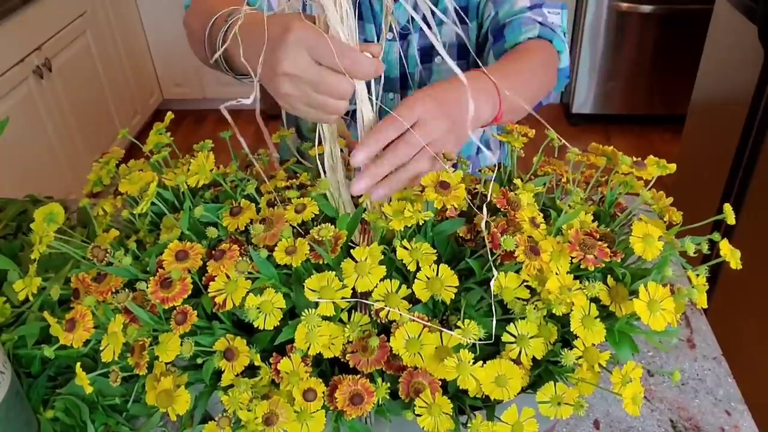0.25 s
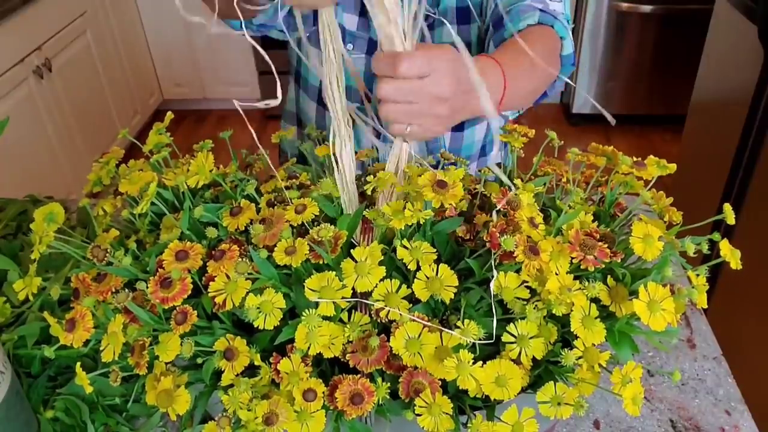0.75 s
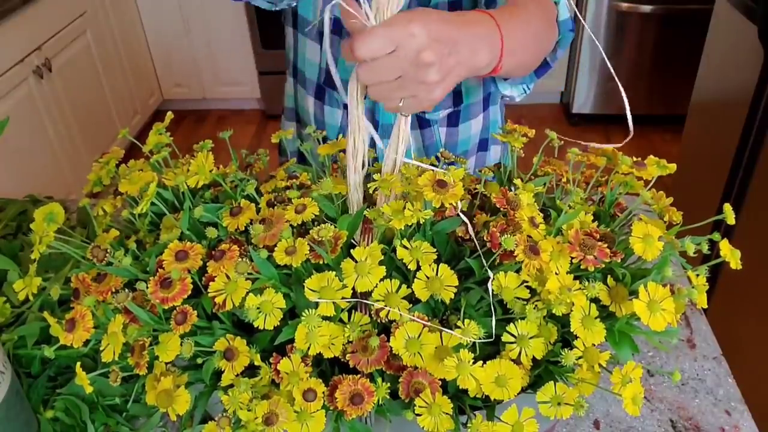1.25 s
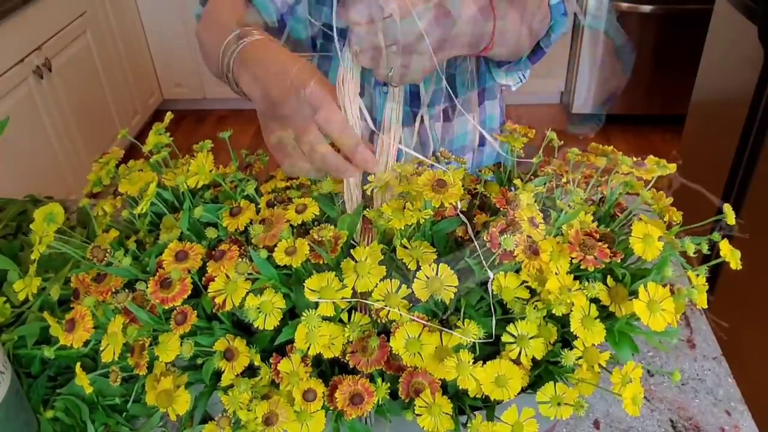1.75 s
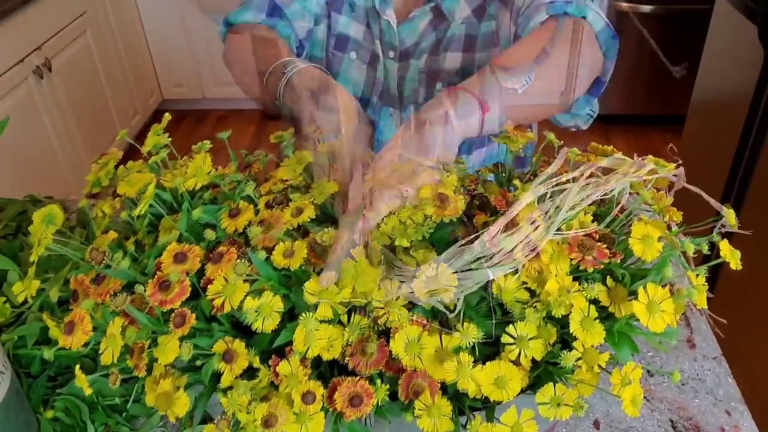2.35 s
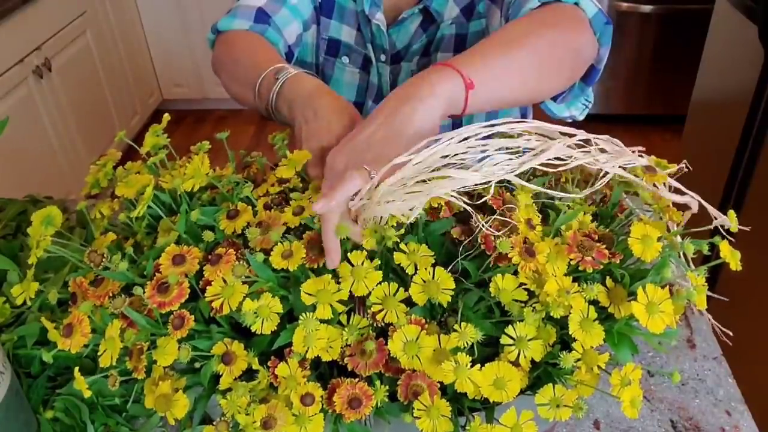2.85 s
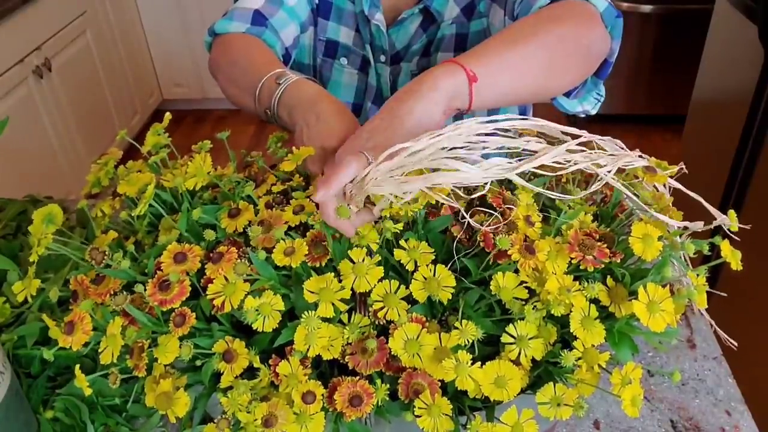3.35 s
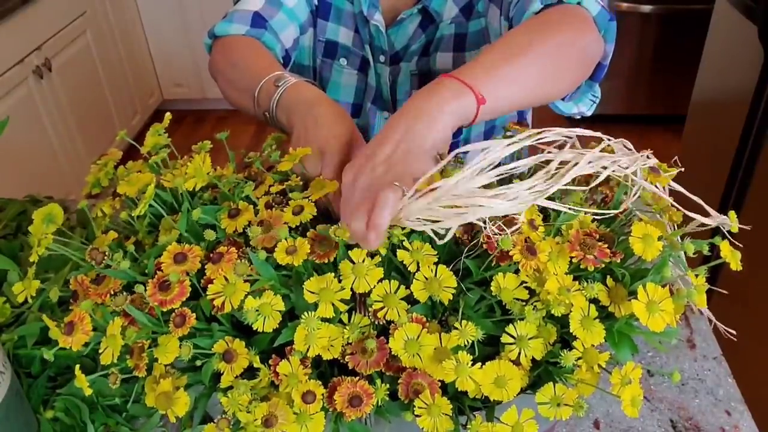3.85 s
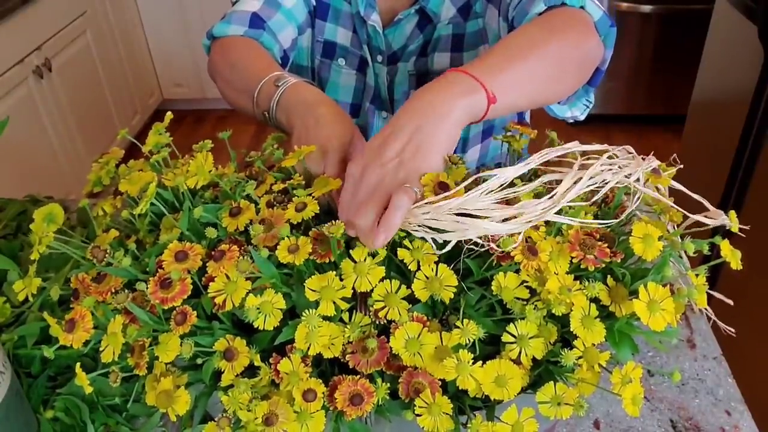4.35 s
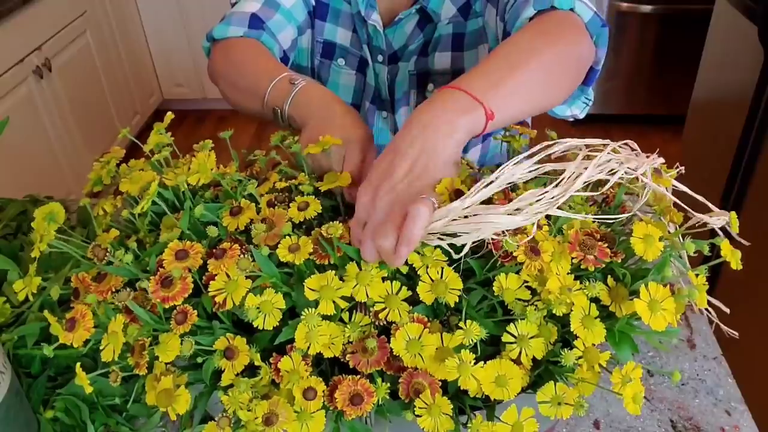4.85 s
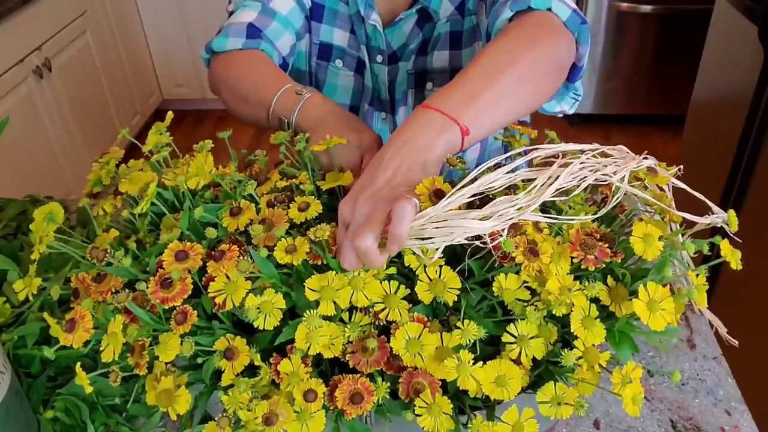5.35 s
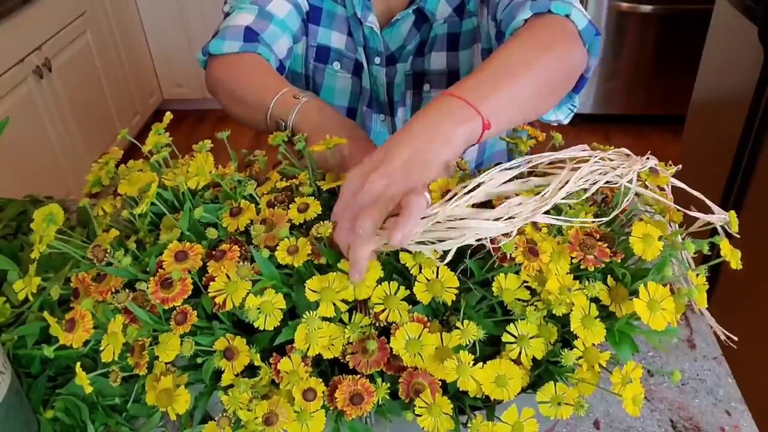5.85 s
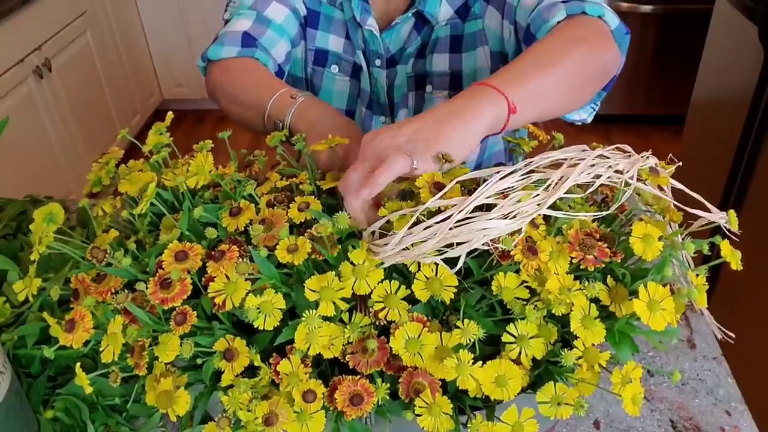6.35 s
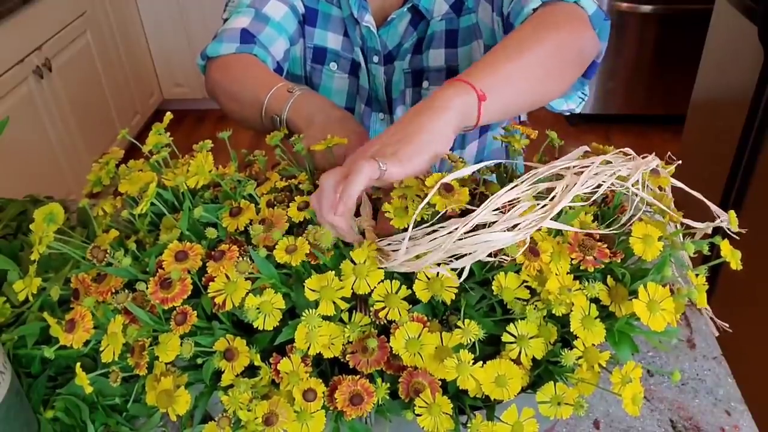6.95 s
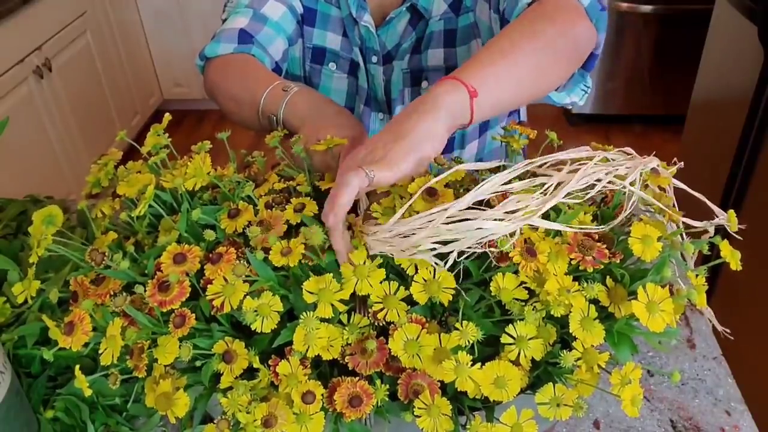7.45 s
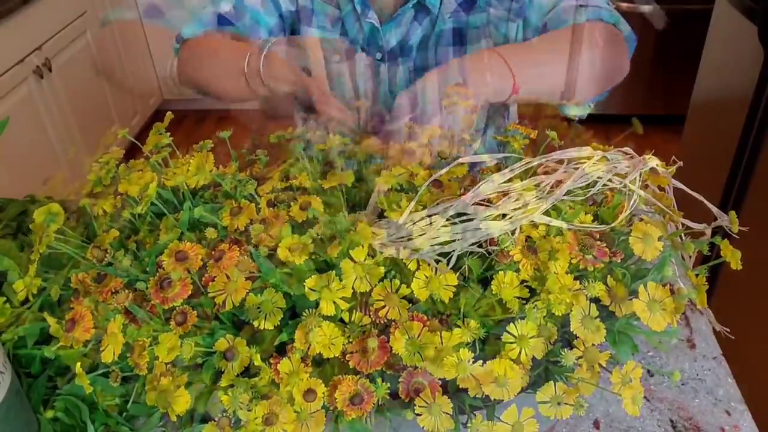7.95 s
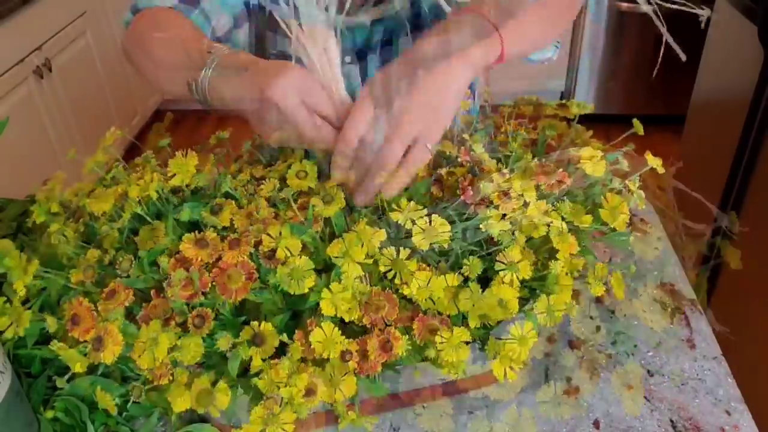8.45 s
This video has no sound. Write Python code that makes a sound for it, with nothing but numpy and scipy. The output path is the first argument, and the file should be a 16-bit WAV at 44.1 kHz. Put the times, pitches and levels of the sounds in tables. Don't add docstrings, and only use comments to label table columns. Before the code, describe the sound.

A low, soft fridge hum and whir runs throughout a small, hard kitchen with a short echo. Close by, spread wide in stereo, dry raffia rustles immediately, with faint stem taps before 0.6 seconds. A stronger papery pull around 0.8-1.3 brings bright, sharp snaps, loudest near 1.1. More swishes stir leaves from 1.8 to 2.8, with tiny wet squeaks near 2.3 and 2.7. Hollow bucket knocks with a brief boom land around 2.5, 2.8, 3.5, 4.0 and 5.1-5.4, between small tugs and crackles. Handling turns sparser, with a crisp rustle near 6.2 and light touches around 6.8. At 7.3 something hard clatters on the counter in a quick splintering burst. A knock follows at 7.9, thin bangles clink from 8.0 to 8.2, the bunch thuds softly at 8.4 with a brisk rustle, and last clinks sound near 8.6.

```python
import sys
import numpy as np
from scipy import signal
from scipy.fft import rfft, irfft
from scipy.io import wavfile

SR = 44100
rng = np.random.default_rng(int(sys.argv[2]) if len(sys.argv) > 2 else 0)


def output_pcm(signal):
    pcm = np.clip(np.atleast_2d(signal).T, -1, 1) * 32767
    wavfile.write(sys.argv[1], SR, np.round(pcm).astype(np.int16))


def volts_from_decibels(level):
    exponent = np.asarray(level, float) / 20
    return 10 ** exponent


N = 383229

# f/Hz, density/dB per Hz
RAFFIA_SPECTRUM = [(880, -37), (1500, -16.5), (2010, -14), (2120, -8), (2290, -17.5), (2760, -6.5),
                   (3050, 0.5), (3360, -0.5), (6190, 1.5), (6960, 0.5), (7990, 2), (9080, -5), (14100, 1.5),
                   (15800, -7.5)]
# t/s, peak level/dB, air boom/dB
STEM_KNOCKS = [(0.295, -45.5, -8), (0.515, -38.5, -7), (2.487, -38.5, -4.5), (2.828, -29, -12.5),
               (2.89, -43, -2), (3.465, -25.5, -15.5), (3.974, -29.5, -13), (5.1095, -25.5, -13),
               (5.301, -28.5, -11.5), (5.407, -33, -11), (6.814, -47.5, -7), (7.632, -42, -27),
               (7.857, -29, -14)]


def rustle():
    # f/Hz, density/dB per Hz
    leaf_spectrum = [(500, -15), (900, 1), (1400, -7), (2100, 0), (2800, 2.5), (4000, -12)]
    level_db, bright_db, leaf_db = handling()
    clump = volts_from_decibels(2.0 * drift(220) + 1.2 * drift(35))
    crackles = rms_one(grains(150 * volts_from_decibels(.4 * (level_db + 55)), 2.5))
    slips = rms_one(grains(9000, 2.5)) + volts_from_decibels(-9) * crackles
    fibres = rms_one(colour(slips * clump, RAFFIA_SPECTRUM)[0])
    bright = np.clip(volts_from_decibels(bright_db + 2.5) - 1, -.9, 2)
    leaves = rms_one(colour(grains(3000, 4.6) * volts_from_decibels(4.9 * drift(20.0)), leaf_spectrum)[0])
    strands = fibres + bright * high_pass(fibres, 5900, order=2)
    return volts_from_decibels(level_db - 5.0) * strands + volts_from_decibels(leaf_db - 8.0) * leaves


def handling():
    # t/s at full strength, hold/s, level/dB, rise/s and fall/s per 20 dB
    pulls = [(0.0, 0.11, -45, .05, 0.096), (.2, 0.15, -61.5, .05, 0.42), (.79, 0.39, -44.5, 0.26, 0.9),
             (1.85, 0.29, -52, 0.098, 0.044), (2.24, 0.33, -44, 0.1, 0.5), (3.03, 0.23, -55, 0.14, 0.27),
             (3.55, 0.55, -63.5, 0.14, .1), (4.76, 0.29, -58.5, 0.13, 0.17), (5.33, 0.24, -58, .1, 0.19),
             (7.335, 0.13, -53.5, 0.019, 0.2), (8.01, 0.36, -49, 0.17, 0.45)]
    # t/s, level/dB, rise/s, fall/s
    tugs = [(1.768, -43.5, 0.074, 0.036), (2.91, -47, 0.18, 0.14), (3.25, -57.5, 0.31, 0.18),
            (3.41, -58, 0.15, 0.075), (3.47, -60, 0.048, 0.099), (3.66, -50.5, 0.13, 0.096),
            (3.77, -57.5, 0.12, 0.068), (3.88, -52.5, 0.15, 0.22), (4.0, -58.5, 0.043, 0.08),
            (4.23, -54, .2, 0.061), (4.43, -66.5, 0.15, 0.037), (4.575, -60.5, 0.037, 0.12),
            (4.62, -60.5, 0.13, 0.09), (4.765, -59.5, 0.046, 0.061), (4.931, -51, 0.037, 0.063),
            (5.1, -49.5, 0.16, 0.11), (5.29, -52.5, 0.17, 0.093), (5.75, -55, 0.021, 0.083),
            (6.02, -56, 0.14, 0.084), (6.168, -45, 0.14, 0.069), (6.81, -51, 0.11, 0.11),
            (6.93, -68.5, .1, 1), (7.26, -55, 0.046, 0.031), (7.89, -62, 0.94, 0.077),
            (8.433, -41, 0.1, 0.17)]
    # t/s, level/dB, rise/s, fall/s
    swishes = [
        (.1, -55.5, 0.97, 0.16),
        (1.97, -55.5, 0.27, 0.46),
        (2.48, -53, 0.32, 0.59),
        (6.17, -62, 0.11, 0.15),
        (6.79, -59, 0.056, 0.065),
        (7.33, -56.5, 0.054, 0.53),
        (8.01, -57.5, 0.39, 0.19),
        (8.432, -53.5, 0.26, 0.16),
    ]
    level_db = strokes(list(pulls) + [(s, 0, *rest) for s, *rest in tugs])
    shakes = [(s + 0.0087, 0, db - 33, 0.073, 0.28) for s, db, _ in STEM_KNOCKS]
    brushed_db = strokes(shakes + [(s, 0, *rest) for s, *rest in swishes])
    effort_db = level_db + 55
    stirred_db = -74.5 + 1.2 * effort_db
    leaf_db = 10 * np.log10(volts_from_decibels(brushed_db) ** 2 + volts_from_decibels(stirred_db) ** 2)
    return level_db, 1.5 + 0.016 * effort_db, leaf_db


def strokes(rows):
    t, power = np.arange(0, N, 64) / SR, 1e-11
    for s, hold_s, db, rise_s, fall_s in rows:
        before = np.maximum(s - t, 0) / max(rise_s, .005)
        after = np.maximum(t - s - hold_s, 0) / max(fall_s, .005)
        power = power + volts_from_decibels(db - 20 * (before + after)) ** 2
    return np.interp(np.arange(N) / SR, t, 10 * np.log10(power))


def snaps():
    # t/s, peak level/dB
    broad_snaps = [(0.783, -35), (1.136, -19.5), (1.547, -32), (1.734, -35), (1.829, -35), (2.041, -31.5),
                   (2.2411, -37.5), (3.005, -30.5), (3.022, -30.5), (3.775, -40), (3.8366, -47),
                   (3.997, -34.5), (4.926, -43), (5.989, -48), (6.771, -38), (6.909, -43.5), (7.264, -40),
                   (7.722, -35)]
    # t/s, peak level/dB, f/Hz
    thin_snaps = [(0.225, -43, 12850), (0.3095, -49, 15300), (0.496, -43, 12100), (0.565, -42, 15550),
                  (0.652, -41, 12800), (0.799, -28.5, 13000), (0.828, -36, 11900), (0.8854, -38, 14000),
                  (0.9396, -30.5, 14000), (1.086, -35, 14700), (1.103, -30, 13000), (1.1346, -24, 12100),
                  (1.7335, -35, 14100), (1.756, -27, 15500), (1.88, -34, 14200), (2.117, -38, 14000),
                  (2.187, -35, 12900), (2.82, -44, 14800), (2.844, -36, 12300), (3.096, -43, 14050),
                  (3.389, -44, 13000), (3.4085, -42, 14400), (3.639, -43, 14200), (3.7384, -36, 12400),
                  (4.8205, -51, 14500), (4.987, -33.5, 13100), (4.993, -34, 14700), (5.0865, -30, 11900),
                  (5.484, -40, 12100), (5.742, -47, 14100), (6.085, -43, 12200), (6.1335, -31, 14900),
                  (6.8247, -34, 13300), (7.242, -52, 14100)]
    broad_hz, fray_s, tear_s = 7670, 0.003, 0.0012
    events = [(s, db, broad_hz, fray_s) for s, db in broad_snaps]
    events = sorted(events + [(*row, fray_s) for row in thin_snaps])
    pings, t = np.zeros(N), np.arange(1000)
    for (s, db, hz, _), tear in zip(events, rng.standard_normal((len(events), len(t)))):
        at = round(s * SR)
        tearing = tear * np.exp(-t / SR / tear_s)
        pings[at:at + len(t)] += volts_from_decibels(db - 8.5) * ring(tearing, hz, 25.0 / hz)
    return pings + volts_from_decibels(-9.5) * spray(events, RAFFIA_SPECTRUM, rise_s=0.00033)


def knocks():
    # f/Hz, level/dB, T60/s
    bucket_air = [(324.5, 9.5, 0.085), (422, -6, 0.066), (535, -1.5, 0.018)]
    # f/Hz, level/dB, T60/s
    bucket_wall = [(691, -9, 0.58), (758, -0.5, 0.32), (847, -6, .3), (955, -10, 0.21), (1038, -11.5, .2),
                   (1110, -13, 0.15), (1227, -10.5, 0.14), (1497, -12.5, 0.17), (1725, -5.5, 0.19),
                   (2040, -11.5, .08), (2147, -11.5, 0.21), (2484, -21, 0.053), (2700, -16, 0.064),
                   (3090, -9.5, .1), (3500, -10.5, 0.11)]
    # f/Hz, density/dB per Hz
    stem_crunch = [(400, -20.5), (800, -2.5), (1300, -1), (1900, 0.5), (2400, -8), (2700, -12.5),
                   (3600, -12), (4800, -30.5)]
    bounce_s, bounce_db, bounce_loss_db_per_s = .010, -15, 220
    wall_damping = .6
    softness = 0.5
    dulling = 0.27
    crunch_db, crunch_s = -5, .018
    s, db, boom_db = np.transpose(STEM_KNOCKS)
    blows, booms, wall = np.zeros((3, N))
    blows[np.round((s + .0006) * SR).astype(int)] = volts_from_decibels(db + softness * np.minimum(db + 32, 0))
    booms[np.round((s + .0015) * SR).astype(int)] = volts_from_decibels(db + boom_db + 2.0)
    tap = ring(ring(blows, 1150, 0.0039), 1254, 0.0042) * volts_from_decibels(-11.0)

    after = np.cumsum(rng.uniform(.4, 1.3, (len(s), 5)), axis=1) * bounce_s
    contact_at = np.round((s + .0026) * SR).astype(int)
    bounce_at = ((s[:, None] + after) * SR).astype(int)
    lucks = rng.standard_normal((len(s), 6, len(bucket_wall))).T
    for (hz, mode_db, t60), luck in zip(bucket_wall, lucks):
        touches = np.zeros(N)
        mode_blow_db = db + dulling * np.minimum(db + 23, 0) * max(np.log2(hz / 1000), 0)
        touches[contact_at] = volts_from_decibels(mode_blow_db + 2.5 * luck[0]) * np.sign(np.sin(hz))
        fading_db = mode_blow_db[:, None] + bounce_db - bounce_loss_db_per_s * after
        touches[bounce_at] = volts_from_decibels(fading_db) * luck[1:].T
        wall += volts_from_decibels(mode_db - 13.0) * ring(touches, hz, wall_damping * t60)
    wall = signal.lfilter([.2], [1, -.8], wall)

    push = signal.lfilter(np.hanning(60) / 30, [1], booms)
    boom = sum(volts_from_decibels(air_db - 3.0) * ring(push, hz, t60) for hz, air_db, t60 in bucket_air)
    jostles = np.c_[s + .001, db + crunch_db + dulling * (db + 25), np.full(len(s), crunch_s)]
    crunch = spray(jostles, stem_crunch, rise_s=0.00079)
    return high_pass(tap + wall + crunch, 344, order=4), high_pass(boom, 300, order=4)


def squeaks():
    # t/s, slip rate f/Hz, level/dB
    slides = [
        [(2.27, 465, -77), (2.29, 466, -61.5), (2.35, 467, -64), (2.38, 475, -71)],
        [(2.6, 523, -81), (2.64, 527, -53), (2.68, 526, -57), (2.715, 535, -58), (2.74, 527, -86)],
    ]
    out, t = np.zeros(N), np.arange(N) / SR
    for rows in slides:
        hz, db = in_time(rows)
        phase = 2 * np.pi * np.cumsum(hz * (1 + 0.0272 * drift(77.0))) / SR
        partials = zip([1, 2, 4, 5, 6], [-3, 0, -6, -7, -10])
        slipping = (t > rows[0][0]) & (t < rows[-1][0])
        tone = sum(volts_from_decibels(d) * np.sin(k * phase) for k, d in partials)
        out += volts_from_decibels(db + 2.8 * drift(50)) * slipping * tone
    return out


def clatter():
    # t/s, peak level/dB, two favoured f/Hz, rattle length/s
    drops = [
        (7.322, -61, 910, 2090, 0.01),
        (7.332, -35, 6200, 878, 0.036),
        (7.3507, -25.5, 5480, 2090, 0.007),
        (7.357, -26.5, 7200, 878, 0.0073),
        (7.369, -28.5, 1037, 686, 0.0073),
        (7.387, -42, 878, 686, 0.031),
    ]
    # f/Hz, level/dB, T60/s
    piece_modes = [(282, -15, .08), (342, -10, 0.06), (583, -9.5, 0.08), (686, -11.5, 0.23),
                   (878, -9.5, 0.11), (1037, -14, 0.11), (1427, -8, 0.13), (2090, -6.5, 0.04),
                   (2765, -14, 0.059), (3080, -10.5, 0.024), (4940, 1.5, 0.03), (5480, 1.5, 0.013),
                   (6200, -1, 0.013), (7230, 0.5, 0.012), (7480, -3.5, 0.02), (9900, -8, 0.015),
                   (10300, -22, 0.02), (11140, -6, 0.023), (14400, -2, .012)]
    # f/Hz, density/dB per Hz
    crack_spectrum = [(150, -29), (350, -14.5), (1000, -6), (2100, -1), (3500, 0.5), (5500, -3),
                      (7500, 3.5), (10000, -1.5), (16000, -8)]
    rings = struck(drops, piece_modes, 2200, boost_db=5, uneven_db=2.0)
    crack = np.array([spray(drops, crack_spectrum, rise_s=0.0015) for ear in "LR"])
    return volts_from_decibels(-13.0) * high_pass(rings, 240, order=4) + volts_from_decibels(-6.5) * crack


def bangles():
    # t/s, peak level/dB, two loudest f/Hz, rattle length/s
    touches = [(7.6325, -47, 4540, 13660, 0.078), (8.0127, -37, 3190, 6660, 0.0086),
               (8.038, -33, 3910, 13660, 0.019), (8.0556, -29, 4480, 14100, 0.023),
               (8.067, -33.5, 13700, 11160, 0.008), (8.1035, -29.5, 7760, 4660, 0.0077),
               (8.111, -29.5, 11160, 7170, 0.011), (8.121, -37, 13660, 7760, 0.0097),
               (8.130, -32, 6500, 13660, 0.019), (8.182, -41, 7800, 13660, 0.0084),
               (8.464, -46, 4660, 3910, 0.01), (8.474, -35.5, 4660, 13660, 0.011),
               (8.6123, -30.5, 3860, 11160, 0.0019), (8.6135, -34, 5770, 14100, 0.0026),
               (8.625, -40, 5770, 11160, 0.017), (8.6622, -43, 7170, 12900, 0.022)]
    # f/Hz, level/dB, T60/s
    ring_modes = [(3160, -5, .025), (3560, -8, .025), (3910, -3, .025), (4450, -10, .02), (4660, -4, .025),
                  (5770, -5, .022), (6660, -5, .022), (7170, -6, .02), (7760, -4, .02), (7960, -5, .02),
                  (9120, -10, .016), (11160, -8, .016), (12900, -9, .014), (13660, -7, .016),
                  (14100, -9, .014), (14800, -9, .012)]
    # f/Hz, density/dB per Hz
    jingle = [(600, -34.5), (1200, -6.5), (2400, -3), (3200, 16.5), (4600, 13), (7800, 12.5), (10000, 12.5),
              (13700, 17), (16000, 11.5)]
    long_modes = [(hz, db, 1.8 * t60) for hz, db, t60 in ring_modes]
    rings = high_pass(struck(touches, long_modes, 1200, boost_db=12, uneven_db=2.0), 2600, order=4)
    scrape = np.array([spray(touches, jingle, rise_s=0.0015) for ear in "LR"])
    return volts_from_decibels(-12) * rings + volts_from_decibels(-16) * scrape


def thud():
    # t/s, peak level/dB, rattle length/s
    settles = [
        (8.39, -36, 0.0088),
        (8.398, -31, 0.012),
    ]
    # f/Hz, level/dB, T60/s
    low_modes = [(186, 0, 0.053), (312, -11, 0.061), (395, -6, 0.073), (475, -0.5, 0.093), (555, -17, .05),
                 (700, 6.5, 0.058), (1005, 1, 0.06), (1520, -8.5, 0.036)]
    events = [(s, db, 650, length_s) for s, db, length_s in settles]
    return struck(events, low_modes, 311, boost_db=9, uneven_db=3.0)[0]


def fridge():
    # t/s, whir level/dB, hum level/dB
    fridge_levels = [(0.0, -56, -59), (1.09, -59, -63), (1.43, -58, -61), (1.86, -57, -74), (2.2, -56.5, -66),
                     (2.7, -55, -64), (2.95, -55.5, -56), (3.07, -62, -72), (3.36, -62.5, -62.5),
                     (4.21, -63, -61.5), (4.65, -62, -74), (5.3, -60.5, -73), (5.55, -62, -73), (6.0, -62.5, -60),
                     (6.97, -62.5, -65.5), (7.3, -63, -88), (7.75, -58, -61.5), (8.69, -57, -96)]
    # f/Hz, density/dB per Hz
    whir_spectrum = [(18, -13), (60, -1.5), (160, -3.5), (310, -4), (520, -4), (790, -6.5), (1000, -13.5),
                     (1300, -20.5), (1600, -20.5), (2300, -22.5), (4000, -23), (8000, -24.5),
                     (10000, -34.5), (15000, -21.5)]
    # f/Hz, bandwidth/Hz, level/dB
    whir_tones = [(123.6, 11, -12), (150.6, 0.59, -15), (240.9, 16.6, -5.5), (361, 9.2, -8.5), (402, 4, -3)]
    # f/Hz, left-right likeness/1
    likeness = [(60, 0.94), (180, 0.46), (550, 0.51), (1650, -0.2), (4970, 0.013), (15000, 0.048)]
    hum_hz = 56.7
    whir_db, hum_db = in_time(fridge_levels)
    mid, side = colour(rng.standard_normal((2, N)), whir_spectrum)
    scale = np.sqrt(np.mean(mid ** 2))
    white = rng.standard_normal(N)
    for hz, width, db in whir_tones:
        mid = mid + scale * volts_from_decibels(db) * rms_one(ring(white, hz, 3.07 / width))
    alike = np.clip(at_hz(likeness, np.arange(N // 2 + 1) * SR / N), 0, .99)
    side = irfft(rfft(side) * np.sqrt((1 - alike) / (1 + alike)), N)
    hum = volts_from_decibels(hum_db - 1.0) * np.sin(2 * np.pi * np.cumsum(hum_hz + .5 * drift(1.85)) / SR)
    return volts_from_decibels(whir_db - 2.0) * (mid + side * [[1], [-1]]) / scale + hum


def kitchen(x):
    # f/Hz, T60/s
    room_t60 = [(200, 0.14), (700, 0.28), (2000, 0.27), (6000, 0.22), (15000, 0.19)]
    t = np.arange(SR // 2) / SR
    white, tail = rng.standard_normal((2, len(t))), 0
    for low in 90 * 2. ** np.arange(8):
        octave = signal.butter(2, [low, min(2 * low, .45 * SR)], "band", fs=SR, output="sos")
        tail = tail + signal.sosfilt(octave, white) * volts_from_decibels(-60 * t / at_hz(room_t60, 1.4 * low))
    tail = tail * np.clip((t - .003) / 0.00022, 0, 1)
    return signal.fftconvolve(x[None], tail / np.sqrt(np.sum(tail ** 2) / 2), axes=1)[:, :N]


def heard(x, left_db, lead):
    late = np.concatenate([np.zeros(lead), x])[:N]
    return np.array([volts_from_decibels(left_db / 2) * x, volts_from_decibels(-left_db / 2) * late])


def struck(events, modes, per_s, boost_db, uneven_db):
    out, span = np.zeros((2, N + SR)), SR // 5
    draws = rng.exponential(1, (len(events), 2, 30))
    scatter = rng.standard_normal((len(events), len(modes), 2, 1))
    for (s, db, *centres_hz, length_s), draw, own in zip(events, draws, scatter):
        start = round(s * SR) - 1
        clicks = volts_from_decibels(db) * np.pad(rattle(s, length_s, per_s, draw), (0, SR))[start:start + span]
        for (hz, mode_db, t60), luck in zip(modes, own):
            near = np.exp(-(np.log2(hz / np.array(centres_hz)) / .07) ** 2).max()
            gain = volts_from_decibels(mode_db + boost_db * near + uneven_db * luck)
            facing = np.where(near > .5, 1, np.sign(luck))
            out[:, start:start + span] += gain * facing * ring(clicks, hz, t60)
    return out[:, :N]


def rattle(s, length_s, per_s, draws):
    clicks, after = np.zeros(N), np.cumsum(draws[0]) / per_s
    clicks[round(s * SR)] = 0.59
    at = np.minimum(((s + after) * SR).astype(int), N - 1)
    clicks[at] += 0.83 * np.exp(-after / max(length_s, .001)) * (np.minimum(draws[1], 2) - 1)
    return clicks


def spray(events, spectrum, rise_s):
    out, t = np.zeros(N + SR), np.arange(SR // 5) / SR
    bursts = np.clip(rng.laplace(0, 1, (len(events), len(t))), -4, 4)
    for event, clicks in zip(events, bursts):
        at = round(event[0] * SR)
        swell = np.exp(-t / max(event[-1], .0005)) * np.minimum(t / rise_s, 1)
        out[at:at + len(t)] += volts_from_decibels(event[1]) * clicks * swell
    return colour(out[:N], spectrum)[0]


def grains(per_s, spread_db):
    sizes = volts_from_decibels(spread_db * np.minimum(rng.exponential(1, N), 6)) * rng.choice([-1, 1], N)
    return sizes * (rng.random(N) < per_s / SR)


def ring(clicks, hz, t60):
    r, w = volts_from_decibels(-60 / (t60 * SR)), 2 * np.pi * hz / SR
    return signal.lfilter([0, np.sin(w)], [1, -2 * r * np.cos(w), r * r], clicks + 1e-18)


def drift(rate):
    r = np.exp(-2 * np.pi * rate / SR)
    return rms_one(signal.lfilter([1], [1, -2 * r, r * r], rng.standard_normal(N + SR))[SR:])


def colour(x, spectrum):
    size = 2 ** 13
    cepstrum = irfft(np.log(volts_from_decibels(at_hz(spectrum, np.arange(size // 2 + 1) * SR / size))))
    cepstrum[1:size // 2] *= 2
    cepstrum[size // 2 + 1:] = 0
    response = irfft(np.exp(rfft(cepstrum)))
    return signal.fftconvolve(np.atleast_2d(x), response[None], axes=1)[:, :N]


def high_pass(x, hz, order):
    return signal.sosfilt(signal.butter(order, hz, "high", fs=SR, output="sos"), x)


def rms_one(x):
    return x / np.sqrt(np.mean(x ** 2) + 1e-20)


def band_rms(lines, edges):
    return np.sqrt(np.add.reduceat(lines ** 2, edges[:-1], axis=2) / np.diff(edges) + 1e-18)


def at_hz(points, hz):
    return np.interp(np.log(np.maximum(hz, 1)), np.log(np.array(points)[:, 0]), np.array(points)[:, 1])


def in_time(rows):
    s, *columns = np.transpose(rows)
    return [np.interp(np.arange(N) / SR, s, c) for c in columns]


def scene():
    handfuls = [rustle(), rustle()]
    small = snaps() + squeaks()
    hard, boom = knocks()
    boom = boom + volts_from_decibels(-10.5) * high_pass(thud(), 140, order=2)
    rings, crack = bangles(), clatter()
    direct = heard(small + hard, 3.2, lead=3) + heard(boom, -1.5, lead=3)
    direct = direct + heard(handfuls[0], 12, lead=4) + heard(handfuls[1], -6, lead=2)
    direct = direct + rings * volts_from_decibels(np.array([[1.], [-1.]])) + crack * volts_from_decibels(np.array([[2.3], [-2.3]]))
    sent = volts_from_decibels(1) * sum(handfuls) + volts_from_decibels(-6) * small + hard + volts_from_decibels(-3) * boom
    wet = kitchen(sent + volts_from_decibels(-6) * rings[0] + volts_from_decibels(-2) * crack[0])
    return direct + wet * volts_from_decibels(np.array([[1.3], [-1.3]])) + fridge()


def roll_off(x):
    return signal.sosfilt(signal.butter(12, 16960, fs=SR, output="sos"), x)


def record(dry):
    cut = signal.sosfilt(signal.ellip(12, .5, 90, 15750, fs=SR, output="sos"), dry)
    return roll_off(cut)


dry = scene()
out = record(dry)
output_pcm(out)
```